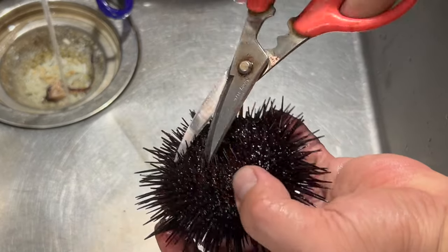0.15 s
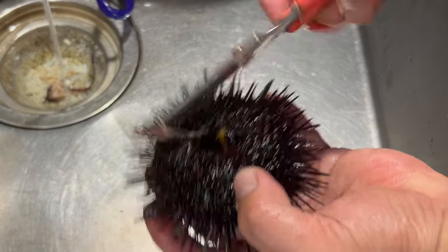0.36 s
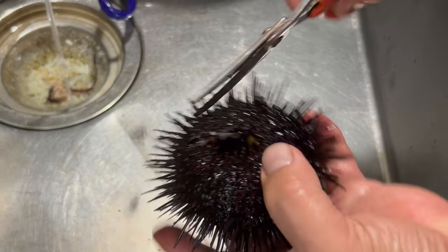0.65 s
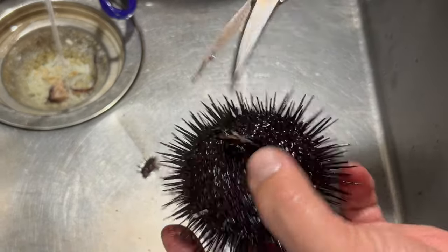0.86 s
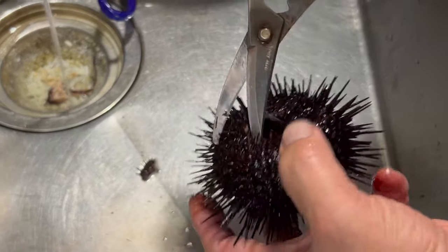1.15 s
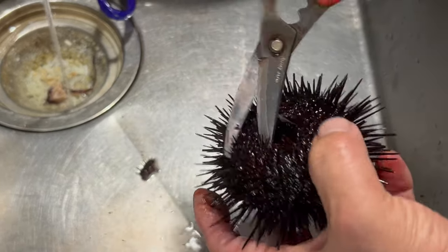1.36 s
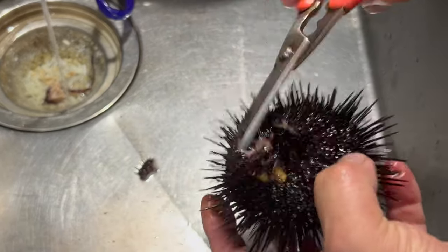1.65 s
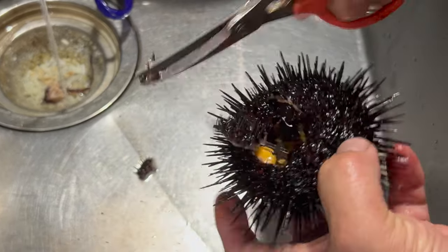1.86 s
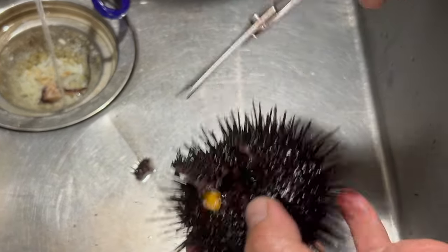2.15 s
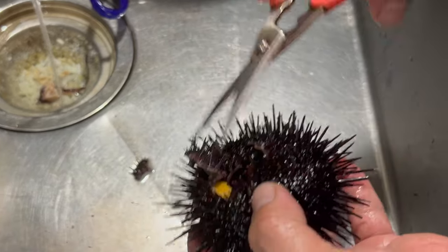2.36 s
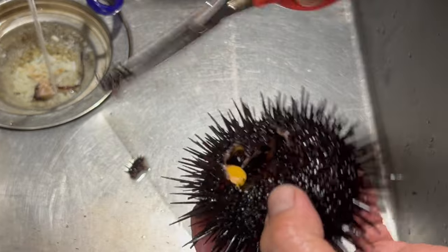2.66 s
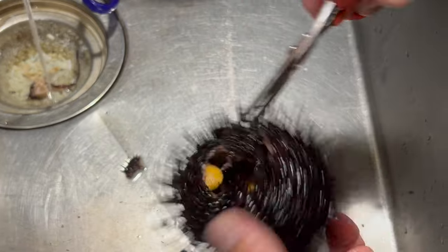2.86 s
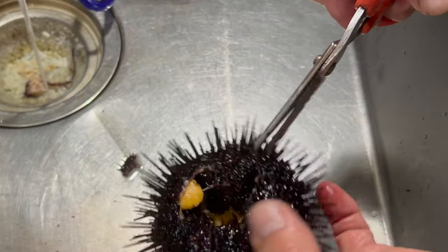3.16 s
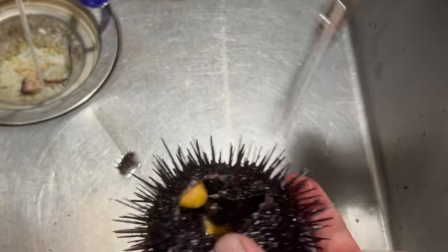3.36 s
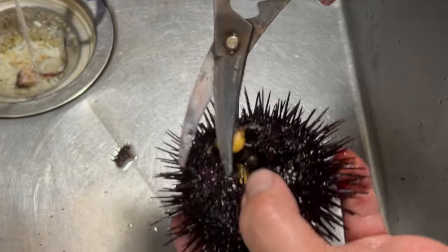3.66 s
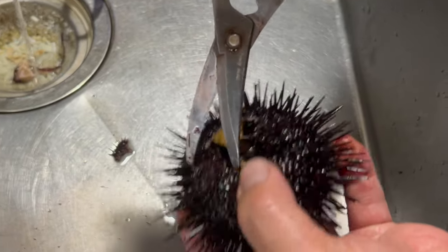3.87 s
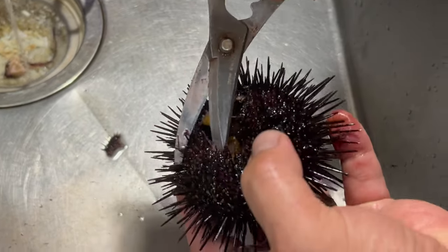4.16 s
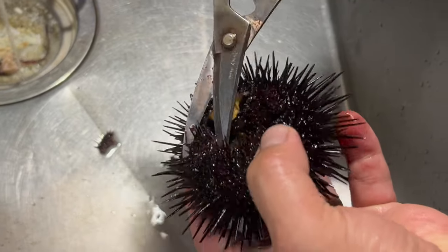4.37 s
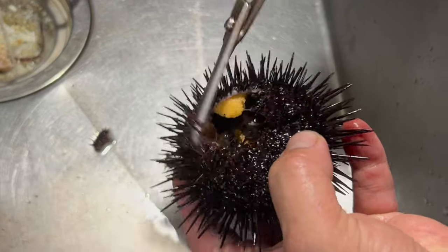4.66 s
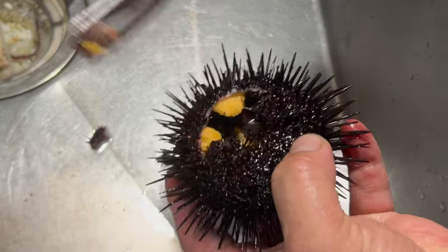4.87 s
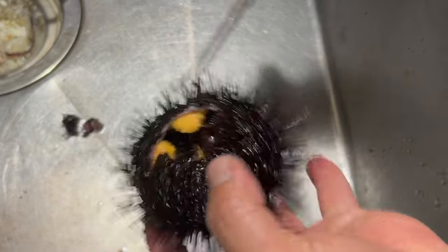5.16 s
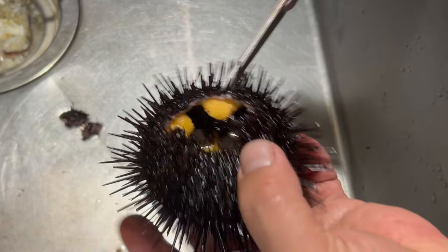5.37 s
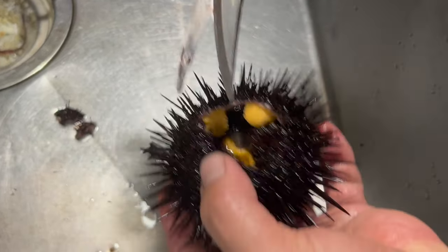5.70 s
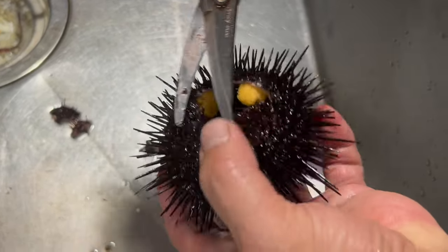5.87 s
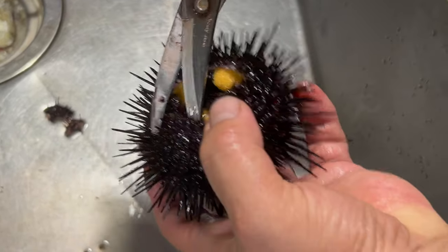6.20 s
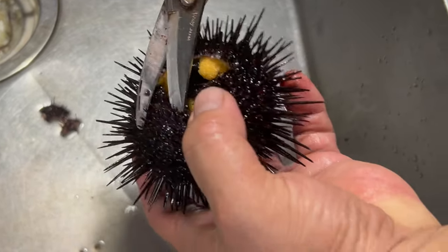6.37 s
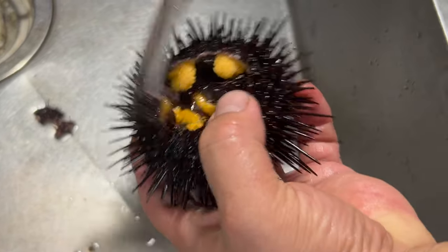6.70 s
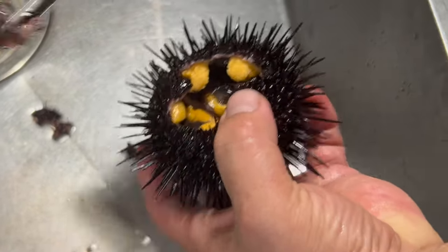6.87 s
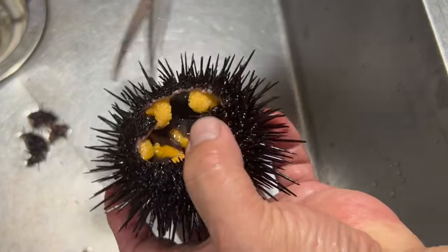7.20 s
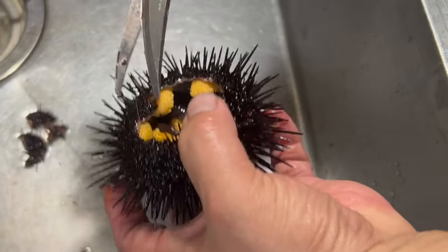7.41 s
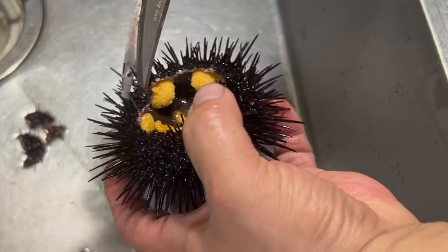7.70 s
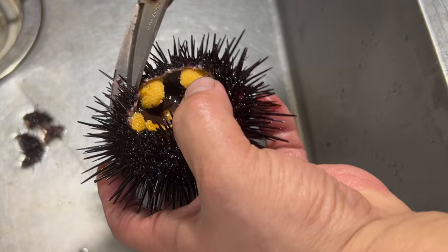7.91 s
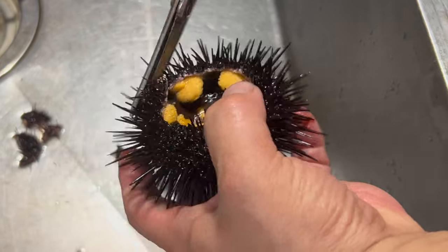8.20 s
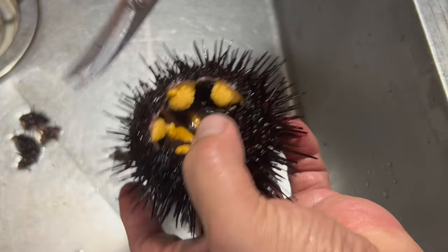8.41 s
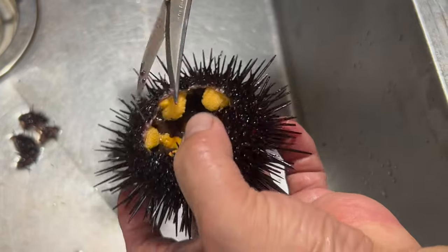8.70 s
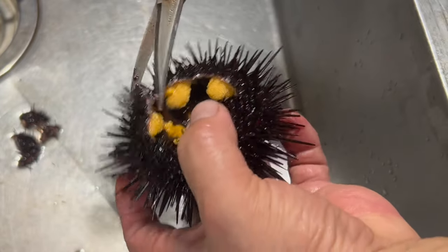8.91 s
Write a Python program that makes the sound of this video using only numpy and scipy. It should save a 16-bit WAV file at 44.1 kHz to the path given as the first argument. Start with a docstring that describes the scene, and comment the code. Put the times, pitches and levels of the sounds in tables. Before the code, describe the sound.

Scissors crunch through a brittle, hollow spiny shell in sharp bursts, pieces slapping and clinking into a steel sink, over a steady low compressor hum.

```python
"""Scissors crack open a sea urchin over a steel sink, close to the microphone, in bursts of noise;
the shell's hollow rings higher from burst to burst. Early on the blades squeak: a falling, chattering tone.
Pieces then drop between the cuts: filtered noise and decaying sines make the slap, clink and ring of steel.
Throughout, two refrigerator compressors, built of sine lines, beat slowly over a fan's coloured noise."""
import sys
import numpy as np
from scipy import signal
from scipy.fft import rfft, irfft, next_fast_len
from scipy.io import wavfile

SR = 44100
rng = np.random.default_rng(int(sys.argv[2]) if len(sys.argv) > 2 else 0)


def output_pcm(signal):
    """Save a mono or channel-first signal as 16-bit PCM at the path in sys.argv[1].

    Samples are clipped to [-1, 1] before scaling.
    """
    pcm = np.clip(np.atleast_2d(signal).T, -1, 1) * 32767
    wavfile.write(sys.argv[1], SR, np.round(pcm).astype(np.int16))


N = 399105
T, HZ = np.arange(N) / SR, np.fft.rfftfreq(N, 1 / SR)


def amp(db):
    """Decibels to gain."""
    return 10 ** (np.asarray(db) / 20)


def unit(x):
    """Scales to rms 1."""
    return x / np.sqrt(np.mean(x ** 2) + 1e-20)


def spread(x, seconds):
    """Scales a burst so that its energy equals rms 1 held for that long."""
    return x * np.sqrt(seconds * SR / (np.sum(x ** 2) / 2 + 1e-20))


def fall(t, t60):
    """Exponential decay that loses 60 dB in t60 seconds."""
    return np.exp(-np.log(1000) * t / t60)


def read(points, hz, axis=1):
    """Reads one column of a table over log frequency."""
    table = np.transpose(points)
    return np.interp(np.log(hz + 1), np.log(table[0] + 1), table[axis])


def colour(x, db_at):
    """Filters x by a gain in dB given as a function of frequency."""
    size = x.shape[-1]
    gain = amp(db_at(np.fft.rfftfreq(size, 1 / SR)))
    return irfft(rfft(x) * gain, size)


def bump(f, hz, width, db):
    """The dB curve of one broad resonance."""
    return db / (1 + (2 * (f - hz) / width) ** 2)


def drift(rate, size=N):
    """Slow chance of rms 1: noise low-passed at about rate Hz."""
    noise = rng.standard_normal(next_fast_len(size, True))
    slow = colour(noise, lambda f: -20 * np.log10(1 + (f / rate) ** 4))
    return unit(slow[:size])


def add(mix, s, sound):
    """Mixes a two-channel sound in at s seconds."""
    part = mix[:, max(round(s * SR), 0):][:, :sound.shape[1]]
    part += sound[:, :part.shape[1]]


# The main cracks of the shell, energy spread over 10 ms. Each row: start in seconds, crunch level in dB
# before the mix, snap over crunch in dB before its trim, decay time constant in seconds, hollow's ring
# over crunch in dB before its trim, opening tick against the fractures that follow in dB before its trim.
SHELL_CRACKS = [(0.001, -33, -12, 0.0071, 6, -15), (0.144, -35.5, -6, .0066, 3, -8),
                (0.165, -36, -2, 0.0095, 6, -10), (0.186, -38.5, 0, .009, 2, -12),
                (0.242, -50, 11, 0.0023, 5, 3), (0.250, -49, 13, .004, 0, -8),
                (0.302, -47, 1, 0.0018, 13, -3), (0.917, -47, 7, .002, 2, 0),
                (1.368, -44, 3, .004, 13, -12), (1.400, -45, 14, .002, -2, 4),
                (1.4903, -38, -3, .002, 4, -3), (1.4943, -42.5, 2, .0016, 20, -6),
                (1.579, -45, 6, .004, 9, -8), (1.5954, -30, 2, .0043, 6, -16),
                (1.602, -37, -5, .004, 7.5, -6), (1.616, -42.5, 9, .011, 3, -10),
                (1.684, -41.5, -1, .0017, -7, -2), (4.0353, -36.5, 0, .002, -5, 4),
                (4.044, -38, -4, .002, 1, 5), (4.1261, -35.5, -1, 0.0021, 2, 0),
                (4.152, -37, -1, .003, 1, -8), (4.1617, -42, 3, .003, 1, 0),
                (4.212, -45.5, 9, 0.0045, 12, -3), (4.228, -45, 6, 0.005, 9, -10),
                (4.2368, -43, 9, .005, 6, -3), (4.2812, -46, 9, .0018, 2, 1),
                (4.2936, -37.5, 6, 0.0026, 8, 9), (4.4278, -34, 7, .003, 1, -2),
                (4.4334, -34, 5, .002, -4, -2), (4.4357, -34, 7, .003, -3, 1),
                (4.4445, -32.5, 0, 0.0064, -4, -12), (4.466, -38, -3, .0047, 4.5, -4),
                (4.483, -44, 9, .003, 3, -4), (4.5659, -40.5, 7, .0025, -4, 1),
                (6.177, -42.5, -5, .0026, 3, -3), (6.3465, -32, -2, 0.0018, 0, -4),
                (6.407, -49, 12, .0014, -3, 4), (6.419, -35.5, 4, 0.0053, -1, -10),
                (6.4268, -31.5, -8, 0.0018, 3, 0), (6.457, -42, -5, .004, 0, -4),
                (6.468, -38, -7, 0.0097, 1, -7), (6.5034, -47, 9, .001, -3, 0),
                (6.507, -35, 7, .002, -6, 1), (6.539, -32.5, -12, 0.0077, -1, -1),
                (7.979, -38.5, 6.5, .002, -6, 3), (8.0308, -43, 9, .0014, -6, 4),
                (8.041, -38, 2, .0078, -1, -2), (8.095, -39, 0, .0055, -1, -6),
                (8.105, -42, 9, .0046, -3, -5), (8.169, -39.5, 5.5, 0.0047, 1, -2),
                (8.2909, -41, 12, 0.0012, 2.5, 2), (8.390, -54.5, 16, .0041, -9, -5),
                (8.8952, -46, 16, .0036, -2, -8)]
# The dull body of breaking shell. Each row: frequency in Hz, relative density in dB per Hz.
CRUNCH_COLOUR = [(800, -36), (1500, 10.5), (2600, 6), (4300, 6), (6500, 3), (8000, -10), (10500, -25)]
# The bright edge of breaking shell. Each row: frequency in Hz, relative density in dB per Hz.
SNAP_COLOUR = [(1500, -46), (5000, -19), (8000, -3), (10000, -0.5), (13000, 2.5), (15500, -1.5),
               (17000, -3)]


def cracks(clump_db=5, ring_db=-1, crunch_db=0.0, snap_db=-1.5, kick=0.53, rise=0.00048, tick_s=0.00035):
    """Each crack opens with one sharp tick, runs on in tiny fractures, and rings the air in the shell."""
    out, t = np.zeros((2, N)), np.arange(3072) / SR
    tick = spread(np.exp(-t / tick_s), 0.66)
    for s, level, bright, decay, hollow_db, tick_db in SHELL_CRACKS + chips():
        grain = (1 - np.exp(-t / rise)) * amp(clump_db * drift(720, len(t)))
        fractures = spread(grain * np.exp(-t / decay), 1)
        run = fractures + amp(tick_db) * tick
        push = grain * np.exp(-t / (decay * kick))  # the air is driven for a shorter time
        noise = rng.standard_normal((2, len(t)))
        parts = [(hollow(noise * push, s), hollow_db + ring_db),
                 (colour(noise, shard(CRUNCH_COLOUR)) * run, crunch_db),
                 (colour(noise, shard(SNAP_COLOUR)) * run, bright + snap_db)]
        add(out, s, sum(amp(level + db) * spread(x, .01) for x, db in parts))
    return out


# Resonances of the shell plates and blades. Each row: frequency in Hz, width in Hz, peak gain in dB.
PLATE_MODES = [(2430, 450, 4), (3780, 450, 8), (4570, 550, 6), (6560, 390, 3.5), (8600, 490, 0),
               (15100, 400, 0)]


def shard(shape, uneven_db=5.0):
    """The colour of one fracture: a base shape, the plate resonances and chance peaks of its own."""
    knots = np.linspace(0, SR / 2, 64)
    peaks = uneven_db * rng.standard_normal(len(knots))
    return lambda f: read(shape, f) + sum(bump(f, *mode) for mode in PLATE_MODES) + np.interp(f, knots, peaks)


# The hollow's air resonance rises as the opening grows. Each row: time in seconds, frequency in Hz.
HOLLOW_PITCH = [(.2, 1580), (1.55, 1640), (4.3, 1940), (6.4, 2020), (8.1, 2460)]
# Each row: multiple of the air resonance, width of one pass in Hz, relative level in dB.
AIR_MODES = [(1, 270, -3)]


def hollow(x, s):
    """The air inside the shell rings at the pitch of time s; two passes make the resonance steep-sided."""
    hz = np.interp(s, *np.transpose(HOLLOW_PITCH))
    return ringing(ringing(x, hz, AIR_MODES), hz, AIR_MODES)


def ringing(x, hz, modes):
    """Rings x through a body of decaying sines whose modes are multiples of hz."""
    t = np.arange(1024) / SR
    ring = sum(amp(db) * np.exp(-np.pi * width * t) * np.sin(2 * np.pi * k * hz * t) for k, width, db in modes)
    return signal.fftconvolve(x, ring[None], axes=1)[:, :x.shape[1]]


# Squeezes of the blades through spines and shell. Each row: start in seconds, end in seconds,
# level in dB of the grit's snap before the mix, which also sets the level of the chips.
SQUEEZES = [(0.14, 0.225, -41), (0.218, 0.365, -48.5), (1.335, 1.447, -45.5), (1.595, 1.665, -45),
            (2.44, 2.549, -51), (4.198, 4.339, -53), (4.431, 4.506, -43), (4.578, 4.737, -49.5),
            (6.432, 6.577, -46.5), (6.654, 6.712, -47), (8.04, 8.232, -46.5), (8.278, 8.412, -56),
            (8.894, 8.92, -52)]


def grinding(per_s=600, size_db=2.0, crunch_db=-5, ring_db=-6, give_db=-7):
    """The blades crush grit: a dense patter of small clicks that weakens as the shell gives way."""
    out = np.zeros((2, N))
    for start, end, db in SQUEEZES:
        size = max(round((end - start) * SR), 1024)
        sizes = amp(size_db * np.minimum(rng.exponential(1, size), 3))
        clicks = (rng.random(size) < per_s / SR) * sizes
        squeeze = signal.windows.tukey(size, .3) * amp(give_db * np.linspace(0, 1, size))
        grit = clicks * squeeze * rng.choice([-1, 1], (2, size))
        snap = unit(colour(grit, shard(SNAP_COLOUR)))
        crunch = unit(colour(grit, shard(CRUNCH_COLOUR)))
        ring = unit(hollow(grit, start))
        add(out, start, amp(db) * (snap + amp(crunch_db) * crunch + amp(ring_db) * ring))
    return out


def chips(per_s=30, over_grit_db=-3.5, scatter_db=1.5, snap_db=8.5, decay_s=0.0022, ring_db=0, tick_db=-4):
    """Small cracks scattered at random through each squeeze, louder in a louder squeeze."""
    rows = []
    for start, end, db in SQUEEZES:
        for _ in range(round(per_s * (end - start))):
            level = db + over_grit_db + scatter_db * rng.standard_normal()
            rows.append((rng.uniform(start, end), level, snap_db, decay_s, ring_db, tick_db))
    return rows


# The falling squeak as the blades are drawn out.
# Each row: time in seconds, frequency in Hz, rms level in dB before the mix.
SQUEAK_PATH = [(0.34, 1740, -56), (0.38, 1696, -45), (0.439, 1620, -51), (0.475, 1480, -60),
               (0.515, 1385, -43), (0.545, 1085, -53), (0.575, 1005, -34), (0.631, 970, -58)]


def squeak(chatter_hz=45):
    """The blades slide out of the wet shell: friction chatters in one resonance that falls in pitch."""
    times, hz, db = np.transpose(SQUEAK_PATH)
    angle = 2 * np.pi * np.cumsum(np.interp(T, times, hz)) / SR
    level = amp(np.interp(T, times, db)) * (T > times[0]) * (T < times[-1])
    chatter = [drift(chatter_hz) * np.cos(angle) + drift(chatter_hz) * np.sin(angle) for _ in range(2)]
    return level * np.array(chatter)


# Pieces hitting the sink, energy spread over 70 ms. Each row: start in seconds, then thud, body, clack and
# splash levels in dB before band trim and mix, time the piece takes to touch down in seconds, pitch of its
# clink in Hz, clink level in dB before the mix, pitch of the sink floor in Hz, boom level in dB before the mix.
PIECE_LANDINGS = [(0.686, -40, -35.5, -35, -29.5, .00193, 4600, -38.5, 228, -42.5),
                  (2.021, -48, -42, -39.5, -27.5, .00096, 3820, -42, 200, -38.5),
                  (2.873, -31.5, -37.5, -36, -38, .0006, 3380, -40, 145, -40),
                  (2.904, -39, -55, -56, -57, .002, 4200, -51, 141, -32),
                  (5.084, -45, -42, -37.5, -32.5, 0.0065, 1460, -38.5, 200, -38),
                  (7.0316, -26.5, -26.5, -26.5, -24.5, 0.00031, 2820, -28, 134, -35)]
# The thud, body, clack and splash bands. Each row: low edge in Hz, high edge in Hz, rise in seconds before
# the touch-down time is added, 60 dB decay in seconds, trim in dB, height of the first slap over the tail.
IMPACT_BANDS = [(120, 810, 0.0032, 0.3, -1.5, 0.3), (925, 1640, 0.0006, 0.31, 1, 0.54),
                (2270, 6100, 0.00053, 0.24, 1.5, 0.33), (7500, 15800, .0002, 0.15, -2, 1.8)]
# Modes of a piece of shell. Each row: multiple of its clink pitch, width in Hz, relative level in dB.
SHELL_PIECE_MODES = [(1, 220, 4.5), (1.14, 240, 3), (1.65, 320, -3)]
# Modes of the steel sink. Each row: frequency in Hz, width in Hz (blow only),
# level in dB: the peak gain for the heaviest blows, and the relative level in the free ring.
SINK_MODES = [(200.4, 31, 16.5), (281, 27, 8), (323.5, 31, 15), (411, 27, 12), (454, 32, 10),
              (1072, 40, 13), (1217, 85, 13), (1388, 57, 10), (1550, 49, 6), (1726, 42, 8), (2800, 360, 10),
              (3140, 280, 13), (4580, 460, 7), (5930, 240, 3), (12300, 160, 12), (13500, 230, 10),
              (13780, 420, 14)]


def landings(rattle_db=1.0, slap_s=0.0065, heavy_db=-24.0, ring_db=2.5, ring_t60=0.47, clink_s=0.021):
    """A wet piece slaps the sink: it clinks and its spines rattle at once, the steel sheet swells and rings on."""
    out, t = np.zeros((2, N)), np.arange(16384) / SR

    def strike(s, db, sound):
        add(out, s, amp(db) * spread(sound, .07))

    for s, *levels, touch, clink_hz, clink_db, floor_hz, boom_db in PIECE_LANDINGS:
        rattle = amp(rattle_db * drift(640, len(t)))
        weight = min(amp(levels[1] - heavy_db), 1)  # a heavier piece brings out the modes more fully
        for db, (low, high, rise, t60, trim_db, slap) in zip(levels, IMPACT_BANDS):
            steel = lambda f: weight * sum(bump(f, *mode) for mode in SINK_MODES)
            band = lambda f: -10 * np.log10(1 + (low / (f + 1)) ** 8 + (f / high) ** 8)
            onset = 1 - np.exp(-t / (rise + touch))
            blow = onset * (slap * np.exp(-t / slap_s) + fall(t, t60))
            noise = rng.standard_normal((2, len(t)))
            strike(s, db + trim_db, colour(noise, lambda f: steel(f) + band(f)) * blow * rattle)
        contact_shape = rattle * (1 - np.exp(-t / touch)) * np.exp(-t / clink_s)
        contact = rng.standard_normal((2, len(t))) * contact_shape
        strike(s, clink_db, ringing(contact, clink_hz, SHELL_PIECE_MODES))
        add(out, s, weight * amp(levels[1] + ring_db) * spread(sheet(t, ring_t60), .07))
        strike(s, boom_db, boom(t, floor_hz))
    return out


def sheet(t, t60, damping_hz=2400, rise=0.004, apart_hz=800):
    """The free ring of the sink's modes; the high ones die first and reach the two channels out of step."""
    modes = np.zeros((2, len(t)))
    for hz, _, db in SINK_MODES:
        decay = fall(t, t60 / (1 + (hz / damping_hz) ** 2))
        turns = rng.random((2, 1)) * min(hz / apart_hz, 1)
        modes += amp(db) * decay * np.sin(2 * np.pi * (hz * t + turns))
    return modes * (1 - np.exp(-t / rise))


def boom(t, hz, t60=0.22, rise=0.0016):
    """The floor of the sink flexes under a piece: one low note, set by where it lands."""
    note = np.sin(2 * np.pi * hz * t) * (1 - np.exp(-t / rise)) * fall(t, t60)
    return np.array([note, note])


def basin(x, wet_db, t60, delay):
    """The steel walls of the sink and the kitchen return a short, dense echo."""
    t = np.arange(SR // 2) / SR
    hits = (rng.random((2, len(t))) < 3000 / SR) * (t > delay)  # 3000 echoes per second
    taps = rng.choice([-1, 1], (2, len(t))) * hits
    tail = spread(taps * fall(t, t60), 1 / SR)
    return x + amp(wet_db) * signal.fftconvolve(x, tail, axes=1)[:, :N]


# Compressor speeds in Hz, and the moment in seconds around which their lines fall in step.
SPEEDS_HZ, IN_STEP_S = (48.07, 47.47), 6.43
# Lines of the first compressor. Each row: multiple of its speed, level in dB before the flutter.
FIRST_LINES = [(1, -39.5), (2, -38.5), (3, -40), (3.5, -46), (4, -62), (4.5, -55.5), (15, -48)]
# Lines of the second compressor. Each row: multiple of its speed, level in dB before the flutter.
SECOND_LINES = [(1, -55), (2, -47.5), (3, -59.5), (5, -50.5), (6, -51), (10, -54), (11, -55), (14, -59.5),
                (17, -52.5), (22, -55), (23, -52.5), (31, -54.5), (36, -52.5)]
# Steady tones: mains hum near 100 Hz and two faint whines.
# Each row: frequency in Hz, level in dB before the flutter.
STEADY_TONES = [(99.9, -52), (119, -49.5), (1000, -50)]


def hum(waver=0.03, flutter=0.14):
    """Two compressors at nearly the same speed, so their low lines beat; mains hum and faint whines are added."""
    lines = [(k * SPEEDS_HZ[0], db) for k, db in FIRST_LINES]
    lines += [(k * SPEEDS_HZ[1], db) for k, db in SECOND_LINES]
    shaft, load, out = drift(2.2), drift(5.4), np.zeros((2, N))
    phases = rng.uniform(0, 2 * np.pi, size=100)  # shared by lines of the same rounded order
    for hz, db in lines + STEADY_TONES:
        order = hz / SPEEDS_HZ[0]
        wobble, swell = (np.roll(v, rng.integers(N)) for v in (shaft, load))
        angle = 2 * np.pi * hz * (T - IN_STEP_S) + waver * order * wobble + phases[round(order)]
        lag = np.array([[0], [read(LEFT_LEAD, hz)]])
        out += amp(db) * np.sqrt(2) * (1 + flutter * swell) * np.cos(angle - lag)
    return out


# The rush of the fan, whose shape also sets the buzz. Each row: frequency in Hz, relative density in dB per Hz.
FAN_COLOUR = [(20, -27.5), (60, -5), (115, 0), (170, -3.5), (260, -6), (350, -13), (460, -9), (800, -12),
              (1150, -11), (1420, -11), (1730, -10.5), (2100, -22.5), (2900, -19), (3800, -25.5),
              (5000, -21.5), (7000, -26.5), (10000, -31), (16000, -30)]


def fan(level_db=-35, swell_db=0.67, ripple_db=2.0):
    """Steady air noise with a slight swell; standing waves in the kitchen ripple its spectrum."""
    knots = np.geomspace(180, 9000, 200)
    ripple = ripple_db * rng.standard_normal(len(knots))
    noise = rng.standard_normal((2, N))
    rush = unit(colour(noise, lambda f: read(FAN_COLOUR, f) + np.interp(f, knots, ripple, 0, 0)))
    return amp(level_db + swell_db * drift(11.3)) * rush


def buzz(level_db=-49, uneven_db=3, waver=0.064, count=68):
    """The second compressor's weak upper harmonics, carried by the same casing as the fan's rush."""
    orders = np.arange(8, count)
    angle = 2 * np.pi * SPEEDS_HZ[1] * T + waver * drift(2.18)
    uneven = uneven_db * rng.standard_normal((2, len(orders)))
    sizes = amp(read(FAN_COLOUR, orders * SPEEDS_HZ[1]) + uneven)
    turn = np.linspace(0, 2 * np.pi, 2048)
    phases = rng.uniform(0, 2 * np.pi, sizes.shape)
    harmonics = sizes[..., None] * np.cos(orders[:, None] * turn + phases[..., None])
    cycles = harmonics.sum(1)  # one turn of the shaft for each channel
    return amp(level_db) * unit(np.array([np.interp(angle % (2 * np.pi), turn, cycle) for cycle in cycles]))


# Each row: frequency in Hz, likeness of the two channels for the background (0 to 1),
# likeness of the two channels for the cutting and landings (0 to 1), left minus right in dB.
CHANNEL_LIKENESS = [(100, 1, 1, 4), (293, 0.68, 0.94, -0.5), (587, 0.02, 0.14, -3),
                    (1180, 0.66, 0.33, -3.5), (1540, 0.05, 0.93, 2.5), (2220, 0.091, 0.54, 1),
                    (3800, 0.37, 0.26, 3), (5900, 0.064, 0.077, 9.5), (7500, 0.27, 0.92, 1),
                    (8500, 1, 0.81, 0.5), (10050, 1, 1, 2.5), (11800, 1, 0.81, -0.5), (13800, 1, 1, 0),
                    (16000, 0.98, 0.77, 1)]
# Phase by which the left channel leads. Each row: frequency in Hz, radians for the background hum and hiss,
# radians for the cutting and landings.
LEFT_LEAD = [(400, 0, 0), (1200, -2.2, -2.1), (1800, -.3, -.2), (2600, 1.8, 1.5), (4500, .7, 1.1),
             (6800, 0, 0), (8500, -1.3, -1.3), (9900, -3.1, -3), (10500, -3.2, -3.5), (11400, -5.3, -4.8),
             (12500, -6.2, -5.8), (14000, -6.28, -6.5), (15500, -6.9, -8)]


def stereo(x, axis):
    """Blends two unrelated versions of a sound into left and right; axis 1 is the background, 2 the cutting."""
    a, b = rfft(x)
    same = np.clip(read(CHANNEL_LIKENESS, HZ, axis=axis), 0, 1)
    tilt = amp(read(CHANNEL_LIKENESS, HZ, axis=3))
    lag = np.exp(-1j * read(LEFT_LEAD, HZ, axis=axis))
    right = (same * a + np.sqrt(1 - same ** 2) * b) * lag
    return irfft(np.array([a * tilt, right]) * np.sqrt(2 / (1 + tilt ** 2)), N)


def scene():
    """Cutting and landings close by, machines further off."""
    cutting = basin(cracks() + grinding() + squeak(), wet_db=-2.5, t60=0.085, delay=0.0022)
    near = cutting + landings()
    return stereo(near, axis=2) * amp(-0.74) + stereo(fan() + buzz(), axis=1) + hum()


# Presence peak of the microphone, one row: frequency in Hz, width in Hz, gain in dB.
PRESENCE_PEAK = (11800, 790, 6.5)


def record(dry, edge_hz=15750):
    """The microphone's presence peak, then a steep low-pass as the band limit."""
    bright = colour(dry, lambda f: bump(f, *PRESENCE_PEAK))
    low_pass = signal.firwin(401, edge_hz, window=("kaiser", 9), fs=SR)
    return signal.oaconvolve(bright, low_pass[None], "same")


dry = scene()
out = record(dry)
output_pcm(out)
```